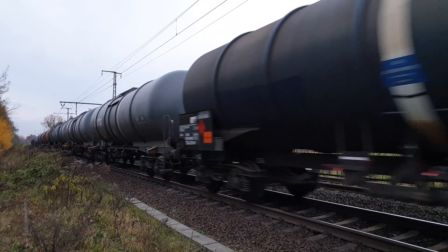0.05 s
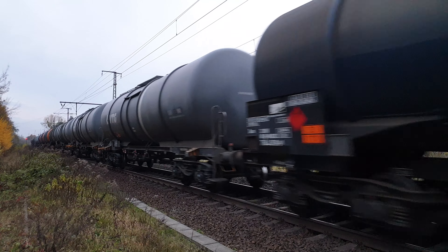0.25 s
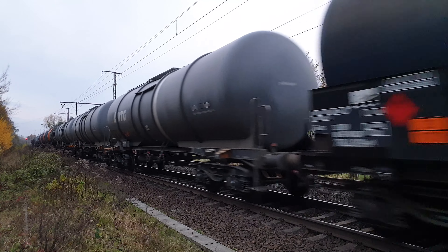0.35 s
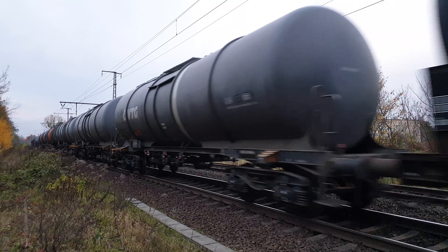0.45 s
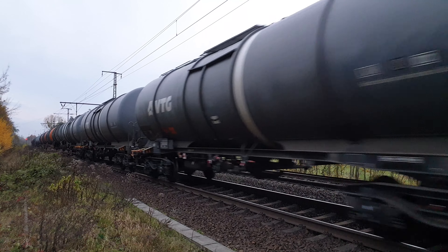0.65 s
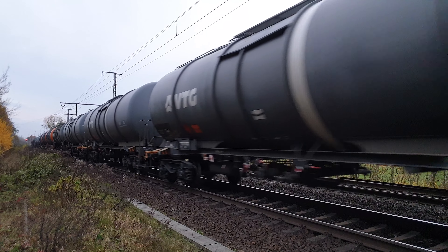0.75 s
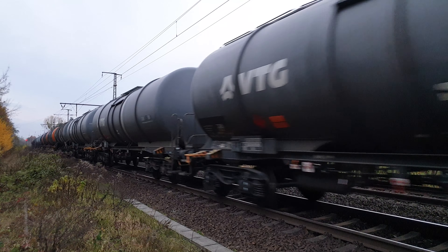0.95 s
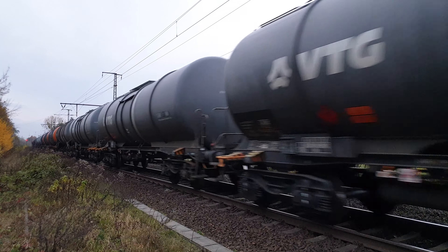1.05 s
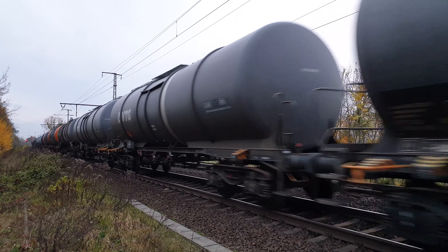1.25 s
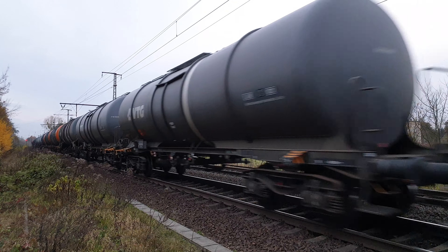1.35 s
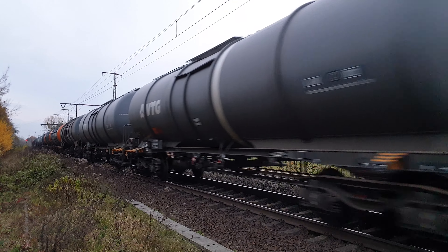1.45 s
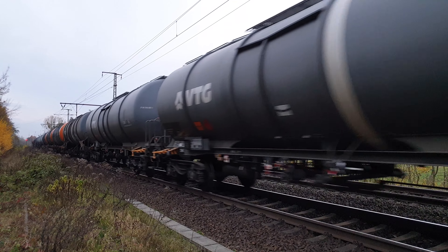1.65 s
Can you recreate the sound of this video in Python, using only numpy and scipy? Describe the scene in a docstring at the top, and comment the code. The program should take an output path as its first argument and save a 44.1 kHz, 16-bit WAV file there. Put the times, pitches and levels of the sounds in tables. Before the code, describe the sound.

Close trackside freight train: steady rolling roar, hollow tank rumble and short clanks at first, strongest near 0.4 seconds, then loud low gusts thump the unprotected microphone while the train sinks and drops out for moments.

```python
"""A train of tank wagons rolls past close by: a broad roar of wheels on rails over a duller drone of the tanks.
Roar and drone are flickering bands of noise; narrow wheel resonances colour the roar.
Short rings are steadied resonances, rattles are bursts of treble clicks.
The draught buffets the microphone in low thumps, an unsteady low swing with lumpy noise, and in two slaps of air.
In the gusts the roar sinks and drops out for moments."""
import sys
import numpy as np
from scipy import signal
from scipy.io import wavfile
from scipy.ndimage import uniform_filter1d

SR = 44100
rng = np.random.default_rng(int(sys.argv[2]) if len(sys.argv) > 2 else 0)


def wav_out(sig):
    """Save sig, one row per channel (or a flat mono array), as 16-bit PCM at SR to the path in sys.argv[1]."""
    wavfile.write(sys.argv[1], SR, np.round(np.clip(np.atleast_2d(sig).T, -1, 1) * 32767).astype(np.int16))


N = 74970  # length in samples
TIME = np.arange(N) / SR  # s


def from_db(db):
    """Turn decibels into an amplitude factor."""
    return 10 ** (np.asarray(db) / 20)


def rms_one(x):
    """Scale a signal to rms 1."""
    return x / np.sqrt(np.mean(x ** 2) + 1e-20)


def in_time(rows):
    """Glide through a table's rows: its columns at every sample."""
    s, *columns = np.transpose(rows)
    return [np.interp(TIME, s, column) for column in columns]


def swell(s, length):
    """A bell-shaped rise and fall."""
    return np.exp(-((TIME - s) / (length / 2)) ** 2)


def drift(rate_hz):
    """Slow random wander of rms about 1: noise through two equal one-pole smoothers."""
    step = 40  # samples between the computed points
    pole = np.exp(-2 * np.pi * rate_hz * step / SR)
    noise = rng.standard_normal(N // step + 2002)
    slow = signal.lfilter([1], [1, -2 * pole, pole * pole], noise)[2000:]  # skip the filter's start
    return np.interp(np.arange(N) / step, np.arange(len(slow)), rms_one(slow))


def bandpass(x, low_hz, high_hz, order):
    """Keep one band of a signal."""
    return signal.sosfilt(signal.butter(order, [low_hz, high_hz], "band", fs=SR, output="sos"), x)


def resonant_noise(hz, width_hz):
    """Noise twice through one resonance; rms 1."""
    r = np.exp(-np.pi * width_hz / SR)
    x = rng.standard_normal(N + SR // 2)
    for _ in range(2):
        x = signal.lfilter([1, 0, -1], [1, -2 * r * np.cos(2 * np.pi * hz / SR), r * r], x)
    return rms_one(x[-N:])


def banded_noise(spectrum, shared_db, own_db, rate_hz, tilt_db=0):
    """Quarter-octave bands of noise from 32 Hz up, flickering together and alone; rms 1."""
    hz, db = np.transpose(spectrum)
    edges = 32 * 2 ** np.arange(0, 9.3, 1 / 4)
    together = drift(rate_hz)
    white = rng.standard_normal((2, N + SR // 4))  # neighbouring bands use different noise
    out = 0
    for k, (low, high) in enumerate(zip(edges, edges[1:])):
        band = bandpass(white[k % 2], low, high, 2)[-N:]
        centre = np.sqrt(low * high)
        octaves_above_5k = max(np.log2(centre / 5000), 0)
        level_db = np.interp(np.log(centre), np.log(hz), db) + tilt_db * octaves_above_5k
        flicker_db = shared_db * together + own_db * drift(rate_hz)
        out = out + from_db(level_db + flicker_db) * band
    return rms_one(out)


# level of the passing train before the dropouts: (t/s, rail roar level/dB, tank drone level/dB)
TRAIN_LEVELS = [(0, -31, -23.5), (.07, -27, -22), (.15, -29.5, -23), (.21, -28, -21.5), (.27, -26, -19.5),
                (.33, -26, -21), (.375, -27, -25), (.415, -25.5, -20), (.46, -24, -23), (.53, -26.5, -21.5),
                (.6, -28, -21.5), (.72, -29, -23.5), (.85, -31.5, -30), (.99, -32.5, -30.5),
                (1.1, -39, -38), (1.21, -36.5, -34.5), (1.265, -33, -32), (1.34, -33.5, -30.5),
                (1.45, -36.5, -35), (1.54, -35, -33.5), (1.7, -41, -39.5)]


def passing_levels_db():
    """Levels of roar and drone as the train goes by."""
    return in_time(TRAIN_LEVELS)


# spectrum of the rail roar before the treble tilt: (f/Hz, relative level per Hz/dB)
ROAR_SPECTRUM = [(290, -22), (500, -0.5), (700, -7.5), (910, -7.5), (1180, -9.5), (1580, -6), (2200, -11.5),
                 (2800, -11.5), (3840, -14.5), (4900, -18.5), (6000, -20), (8000, -24.5), (11400, -29.5),
                 (13000, -40.5), (15500, -58)]
# tilt of the treble over time, dullest from about 1.3 s: (t/s, tilt above 5 kHz/dB per octave)
TREBLE_TILT = [(0, -1), (.6, -1.6), (.9, -1.4), (1.1, -1), (1.3, -5), (1.7, -4)]


def rail_roar(level_db, dip_db):
    """Wheels on rails: broad noise with a fast flicker and the wheels' own resonances, dipping in the dropouts."""
    tilt_db = in_time(TREBLE_TILT)[0]
    rolling = banded_noise(ROAR_SPECTRUM, shared_db=0.71, own_db=1.12, rate_hz=25.0, tilt_db=tilt_db)
    return from_db(level_db + dip_db) * (rolling + wheels())


# wheel modes stirred by the rolling: (f/Hz, mean level against the roar/dB)
WHEEL_RESONANCES = [(500, -14), (894, -20), (1335, -19), (1590, -22.5), (1886, -23), (2255, -23),
                    (2480, -18.5), (2900, -45), (3430, -17.5), (3630, -25), (4150, -24), (4455, -23)]
WHEEL_WIDTH_HZ, WHEEL_FLICKER_DB = 65, 3


def wheels():
    """Narrow wheel resonances stirred by noise, each slowly coming and going."""
    return sum(from_db(db + WHEEL_FLICKER_DB * drift(1.8)) * resonant_noise(hz, WHEEL_WIDTH_HZ)
               for hz, db in WHEEL_RESONANCES)


# spectrum of the tank drone: (f/Hz, relative level per Hz/dB)
DRONE_SPECTRUM = [(24, -56), (40, -34), (59, -5.5), (81, -7.5), (97, -12), (199, -7), (339, -7),
                  (417, -10.5), (900, -24), (1170, -29), (1980, -120)]
DRONE_DROP_SHARE = .8  # the drone dips by this share of the roar's dip in dB


def tank_drone(level_db, dip_db):
    """The tanks' dull drone: low noise whose bands surge mostly together."""
    hum = banded_noise(DRONE_SPECTRUM, shared_db=2.0, own_db=0.17, rate_hz=5.4)
    return from_db(level_db + DRONE_DROP_SHARE * dip_db) * hum


# gritty rattles in the treble: (centre t/s, centre f/Hz, level/dB, length/s)
RATTLE_BURSTS = [(.068, 10000, -43, .012), (0.157, 8800, -42, 0.014), (.22, 9700, -41, .01),
                 (.281, 10800, -39.5, 0.031), (0.283, 8000, -41, .025), (.328, 11500, -50, .01),
                 (0.35, 11500, -46, .014), (.434, 9000, -52, .03), (0.612, 8400, -41.5, 0.048)]
RATTLE_WIDTH_HZ, RATTLE_CLICKS_PER_S = 3600, 7000


def rattles():
    """Loose parts chatter: dense uneven clicks in a broad treble band."""
    clicks = rng.standard_normal(N) * (rng.random(N) < RATTLE_CLICKS_PER_S / SR)
    half = RATTLE_WIDTH_HZ / 2
    out = 0
    for s, hz, db, length in RATTLE_BURSTS:
        chatter = rms_one(bandpass(clicks, hz - half, hz + half, 3))
        out = out + from_db(db) * swell(s, length) * chatter
    return out


# rings of wheels, couplings and tanks: (centre t/s, f/Hz, resonance width/Hz, level/dB, length/s)
METAL_RINGS = [(0.076, 4550, 60, -36.5, .024), (0.213, 2897, 60, -38, 0.048),
               (0.194, 5950, 300, -42, 0.024), (0.212, 343.4, 14, -19, 0.032), (0.294, 339, 27, -23, 0.066),
               (0.263, 2090, 69, -23.5, 0.0095), (.265, 2820, 160, -30.5, 0.015),
               (0.288, 1580, 130, -33, 0.025), (0.423, 2830, 140, -30, 0.016),
               (0.433, 272, 14, -29.5, 0.056), (0.453, 337, 31, -23, 0.025), (.475, 6000, 230, -43, .012),
               (.553, 234, 9.3, -35, 0.035)]
RING_WAVER = .3  # how far a ring's own strength still wavers


def rings():
    """Each ring is a resonance kept going by rubbing, steadied in strength while it swells and fades."""
    out = 0
    for s, hz, width_hz, db, length in METAL_RINGS:
        tone = resonant_noise(hz, width_hz)
        strength = np.abs(signal.hilbert(tone))
        steady = rms_one(tone / (strength + RING_WAVER))
        out = out + from_db(db) * steady * swell(s, length)
    return out


# strength of the buffeting: (t/s, level/dB)
GUST_LEVELS = [(0.44, -36), (0.464, -44), (0.53, -8.5), (0.568, -17), (0.59, -6), (0.626, -11.5),
               (0.674, -18), (0.738, -17.5), (0.775, -12), (0.803, -4), (0.828, -28), (0.846, -7.5),
               (0.912, -20.5), (0.944, -9), (0.968, -18.5), (0.994, -8), (1.05, -3), (1.084, -28),
               (1.106, -14.5), (1.134, -32), (1.158, -34), (1.194, -44), (1.214, -22), (1.236, -22),
               (1.256, -12), (1.27, -6.5), (1.31, -19), (1.33, -8.5), (1.356, -20), (1.39, -26),
               (1.405, -24.5), (1.42, -39), (1.435, -28), (1.455, -33), (1.478, -25), (1.498, -45),
               (1.524, -16), (1.542, -17.5), (1.565, -29), (1.604, -53), (1.64, -20), (1.66, -38),
               (1.684, -44), (1.7, -42)]
# mean rate of the swings, before their random wander: (t/s, f/Hz)
SWING_RATES = [(.5, 47.68), (.54, 56.4), (.56, 48), (.59, 55.3), (.62, 67.4), (.68, 41.6), (.71, 65.6),
               (.77, 62.4), (.8, 49.2), (.84, 68.7), (.9, 45.3), (.94, 78.8), (.99, 60.3), (1.02, 79.1),
               (1.07, 61.3), (1.12, 49.54), (1.2, 85), (1.24, 65.5), (1.28, 42.7), (1.32, 61.76),
               (1.34, 49.5), (1.38, 65.9), (1.46, 44.3), (1.5, 62.3), (1.55, 58.2), (1.65, 55.5)]
GUST_WANDER, GUST_SKEW = 0.098, 0.19  # random spread of the rate (log scale); overtone share
FLUTTER_DB, FLUTTER_HZ = -15, 95.4  # lumpy noise above the swings, against the swing
UNDERTOW_DB, UNDERTOW_HZ = -3, 39.6  # and below them
EVEN_S = 0.0343  # the swings are evened over this time


def wind():
    """Eddies swing the diaphragm at an unsteady rate once the draught arrives."""
    lead_in = [(0, -62), (.4, -72)]  # nearly still air: (t/s, level/dB)
    level_db = in_time(lead_in + list(GUST_LEVELS))[0]
    hz = in_time(SWING_RATES)[0] * np.exp(GUST_WANDER * drift(30.2))
    phase = np.cumsum(2 * np.pi * hz / SR) + rng.uniform(0, 2 * np.pi)
    swing = rms_one(np.sin(phase) + GUST_SKEW * np.cos(2 * phase))
    flutter = from_db(FLUTTER_DB) * resonant_noise(FLUTTER_HZ, width_hz=71)
    undertow = from_db(UNDERTOW_DB) * resonant_noise(UNDERTOW_HZ, width_hz=16.0)
    mix = swing + flutter + undertow
    local_power = uniform_filter1d(mix ** 2, int(EVEN_S * SR))
    return from_db(level_db) * mix / np.sqrt(local_power + 0.066)  # weak moments stay a little weaker


# sudden slaps of air: (onset t/s, starting level before decay and softening/dB, f/Hz)
AIR_SLAPS = [(0.763, 1, 63.7), (1.223, 2, 72.7)]
SLAP_T60_S, SLAP_SOFT_HZ = .075, 220  # time to fall by 60 dB; low-pass corner


def slaps():
    """A slap kicks the diaphragm into a swing that dies within a few cycles."""
    kicks = 0
    for s, db, hz in AIR_SLAPS:
        after = np.maximum(TIME - s, 0)
        kicks = kicks + from_db(db - 60 * after / SLAP_T60_S) * np.sin(2 * np.pi * hz * after)
    return signal.sosfilt(signal.butter(2, SLAP_SOFT_HZ, fs=SR, output="sos"), kicks)


# the roar drops out: (centre t/s, depth before edge rounding/dB, length/s)
ROAR_DROPOUTS = [(0.811, 5, 0.008), (0.896, 6.5, 0.023), (1.044, 9, 0.0059), (1.071, 12.5, 0.011),
                 (1.16, 17, 0.063), (1.298, 30.5, 0.0064), (1.404, 7, 0.031), (1.435, 17.5, 0.0099),
                 (1.486, 11.5, 0.032), (1.619, 7.5, 0.036), (1.675, 9.5, 0.032)]
DROP_EDGE_S = .002  # shortest edge
DROP_FALL, DROP_RECOVERY = .15, .18  # added edge times as shares of the length


def dropouts_db():
    """Dips in level with rounded edges, softer on long dips; the shortest stay shallower than their depth."""
    dip_db = 0
    for s, depth_db, length in ROAR_DROPOUTS:
        fall = np.tanh((TIME - s + length / 2) / (DROP_EDGE_S + DROP_FALL * length))
        recovery = np.tanh((TIME - s - length / 2) / (DROP_EDGE_S + DROP_RECOVERY * length))
        dip_db = dip_db - depth_db * .5 * (fall - recovery)
    return dip_db


def scene():
    """Train and wind at one microphone; the dropouts touch only roar and drone."""
    roar_db, drone_db = passing_levels_db()
    dip_db = dropouts_db()
    train = rail_roar(roar_db, dip_db) + tank_drone(drone_db, dip_db) + rattles() + rings()
    return (train + wind() + slaps())[None]


LOW_CUT_HZ, CUTOFF_HZ = 26.8, 15720


def record(dry):
    """The deepest bass is cut, peaks are rounded, the top is cut."""
    x = signal.sosfilt(signal.butter(4, LOW_CUT_HZ, "high", fs=SR, output="sos"), dry)
    rounded = 1.3 * np.tanh(x / 1.3)
    return signal.sosfilt(signal.ellip(12, .5, 70, CUTOFF_HZ, fs=SR, output="sos"), rounded)


dry = scene()
out = record(dry)
wav_out(out)
```